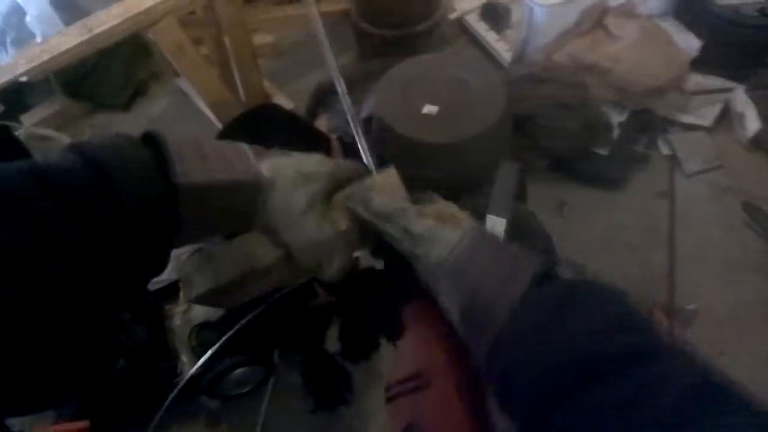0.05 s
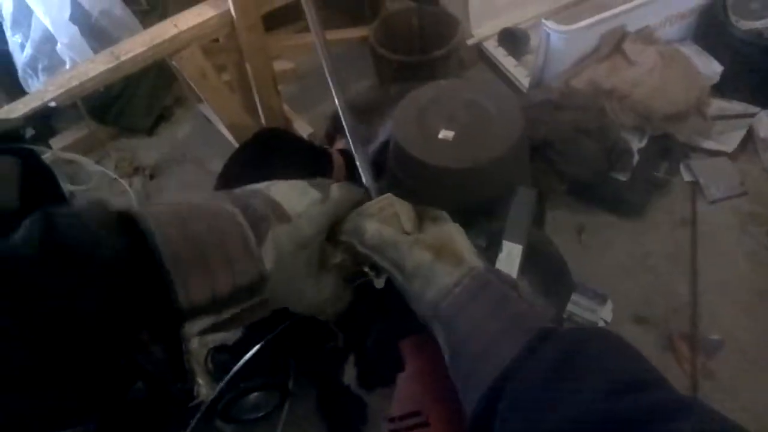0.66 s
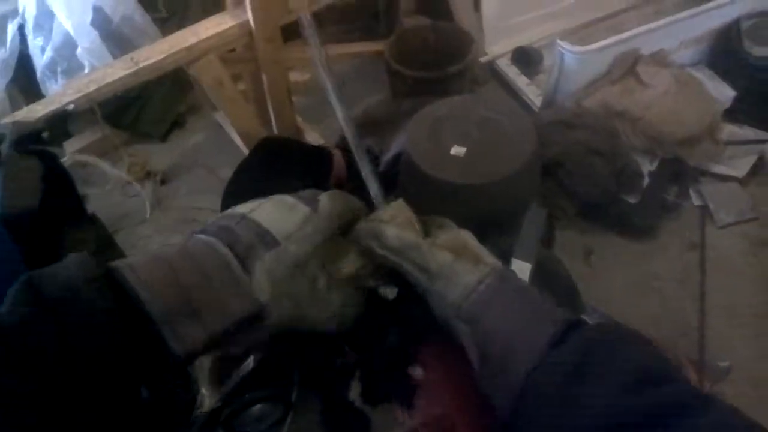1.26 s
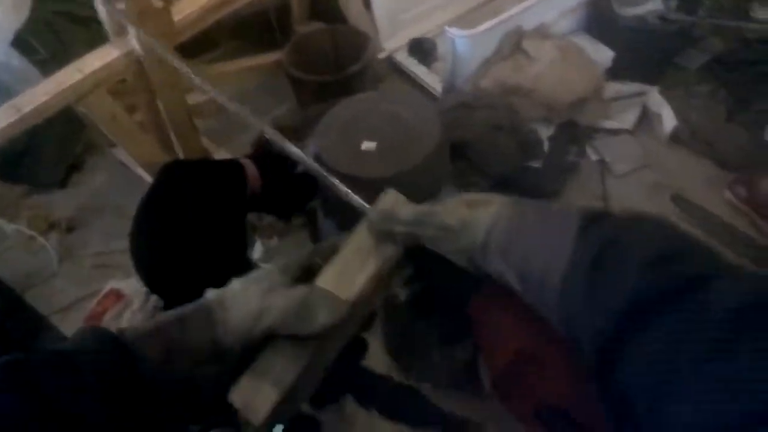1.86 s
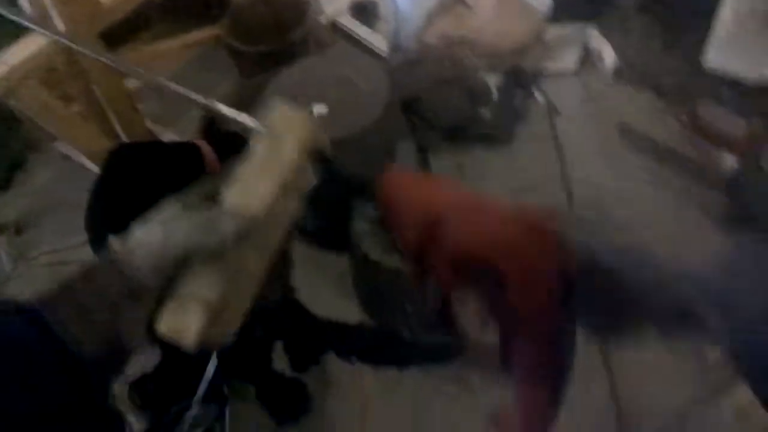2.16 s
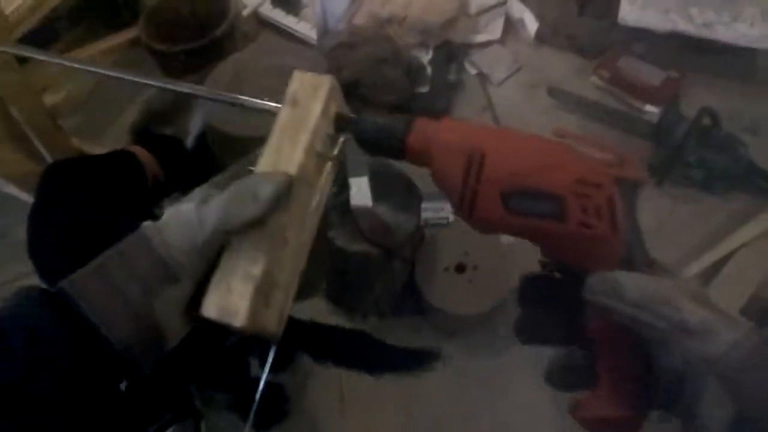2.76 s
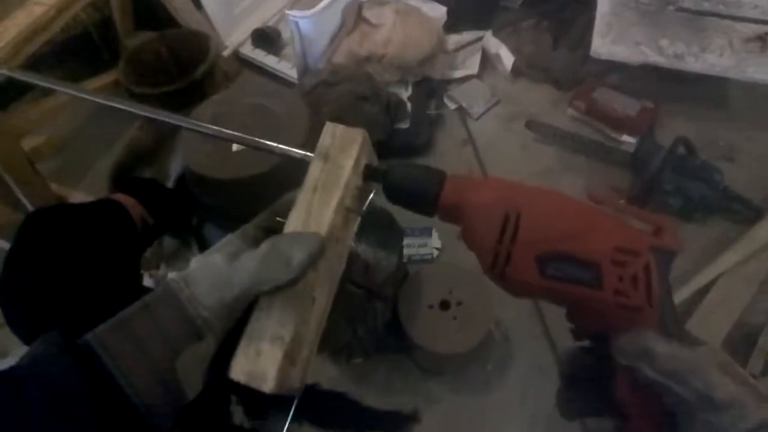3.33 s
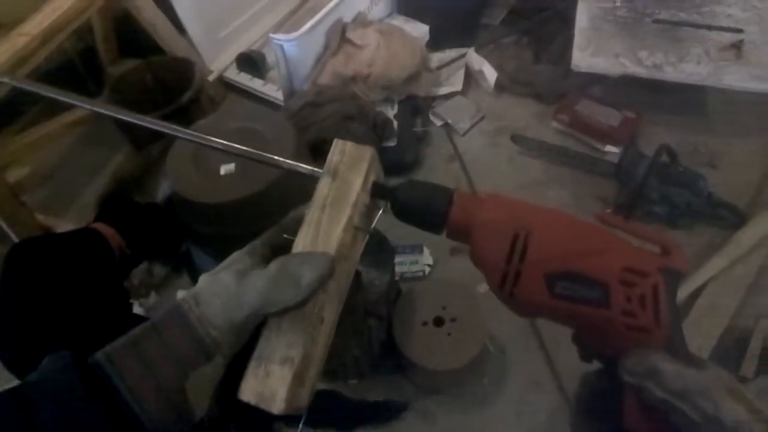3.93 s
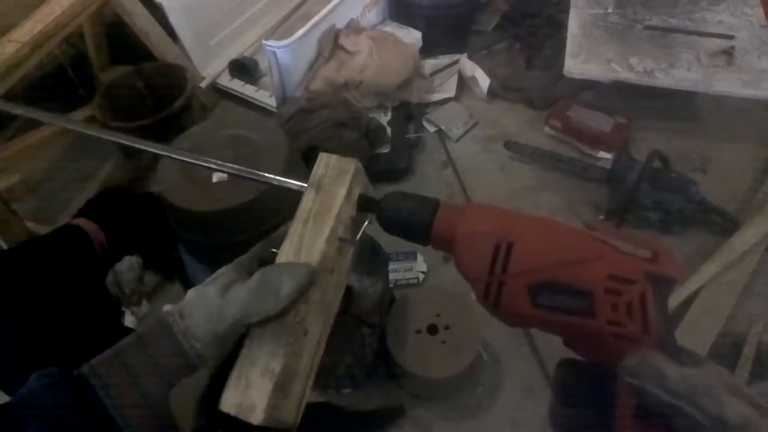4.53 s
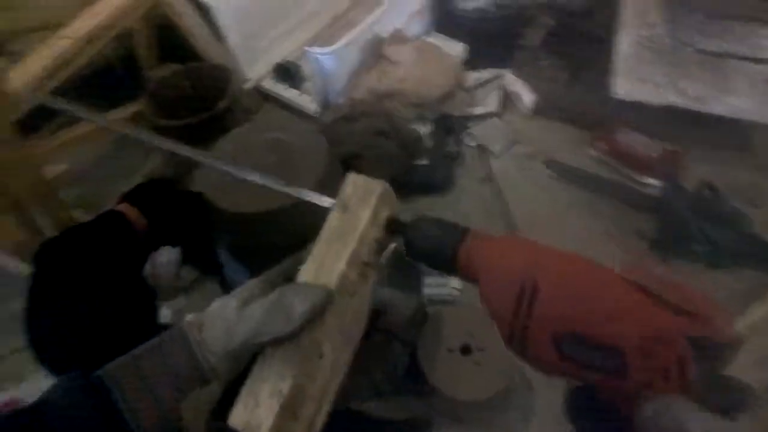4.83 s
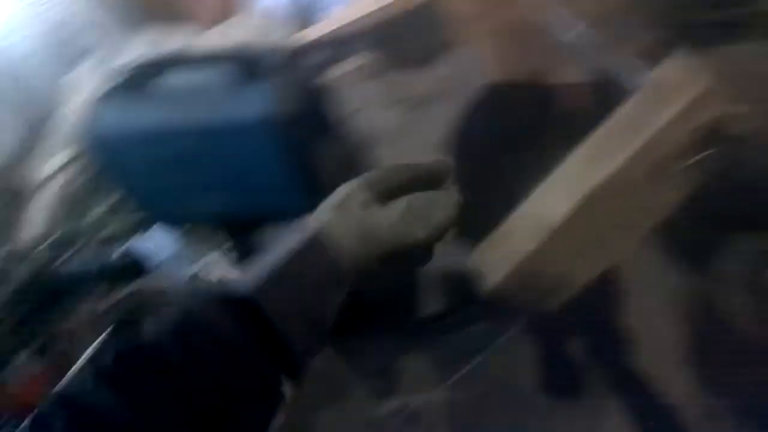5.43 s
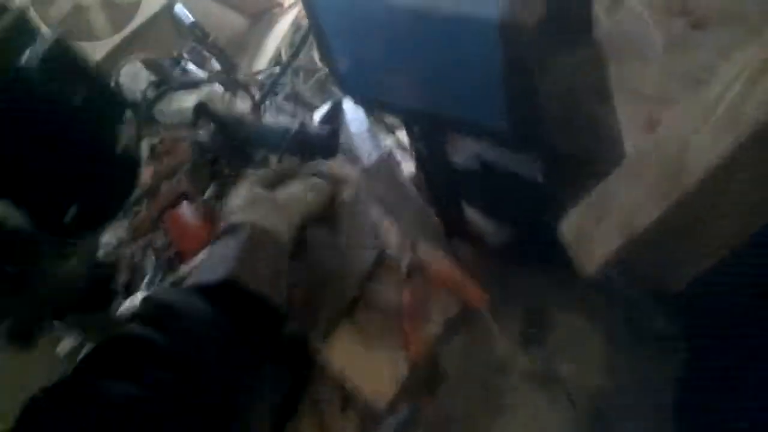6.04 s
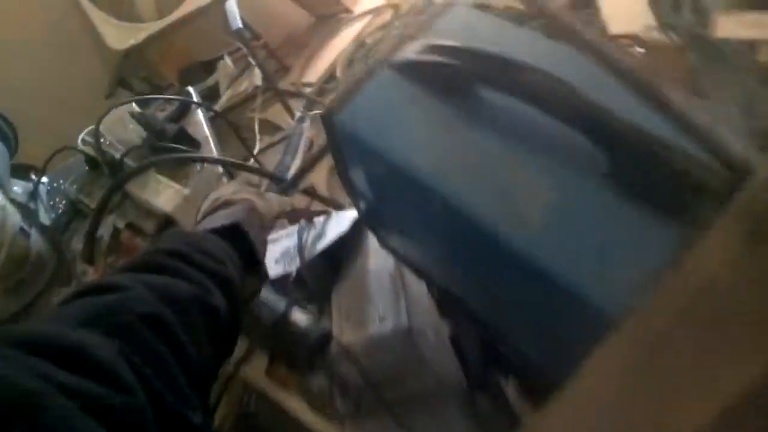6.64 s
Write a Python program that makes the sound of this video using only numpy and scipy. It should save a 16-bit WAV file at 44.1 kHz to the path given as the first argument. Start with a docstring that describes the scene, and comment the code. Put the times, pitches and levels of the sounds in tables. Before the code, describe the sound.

Gloved hands handle a wood block, a steel rod and a switched-off drill in a small, quiet workshop, heard close from a head-worn microphone with soft swells of low rumble. From about 0.7 seconds, leather and cloth rustle and scrape, with a few light wooden knocks. More rubbing and small clicks come around 1.5 seconds, then a brighter scrape and a sharp click near 2.2. The block knocks lightly at about 2.7. From 3 to 4.5 seconds the handling is faint, with isolated ticks and a clearer click at 4.1. A short rustle follows near 4.9. From 5.2 seconds the rubbing grows busier, with plastic and metal clicks and a few tiny squeaks, the clearest just before 6. Sharp clicks land around 6 and 6.2 seconds, and a bright click with a scrape ends it near 6.7.

```python
"""A small, quiet workshop: work gloves shift a wood block, a steel rod and a switched-off drill.
Friction makes cloth and leather rustle and scrape in fine grains, and stick-slip makes a surface squeak.
Impacts excite damped modes: plastic and metal click and ring, and the block knocks lightly.
All is heard from a head-worn camera, with soft swells of dull, low rumble close to the microphone."""
import sys
import numpy as np
from scipy import signal
from scipy.fft import rfft, irfft, next_fast_len
from scipy.io import wavfile

SR = 44100
rng = np.random.default_rng(int(sys.argv[2]) if len(sys.argv) > 2 else 0)


def int16_out(signal):
    """Quantize to a 16-bit WAV file."""
    q = np.round(np.clip(np.atleast_2d(signal).T, -1, 1) * 32767)
    wavfile.write(sys.argv[1], SR, q.astype(np.int16))


N = 295029
TIME = np.arange(N) / SR
FFT_SIZE = next_fast_len(N + 4096, True)
HZ = np.arange(FFT_SIZE // 2 + 1) * SR / FFT_SIZE


def undb(db):
    """Amplitude ratio of a level in decibels."""
    return 10 ** (np.asarray(db) / 20)


def unit(x):
    """Normalisation to an rms of 1."""
    return x / np.sqrt(np.mean(x ** 2) + 1e-30)


def colour(points):
    """Magnitude response interpolated through (frequency [Hz], gain [dB]) points."""
    hz, db = np.transpose(points)
    return undb(np.interp(np.log(HZ + 1), np.log(hz), db))


def shape(x, gain):
    """Filtering by multiplication in the frequency domain."""
    return irfft(rfft(x, FFT_SIZE) * gain, FFT_SIZE)[:N]


def above(hz):
    """Share of the power in the upper branch of a smooth crossover."""
    return 1 - 1 / (1 + (HZ / hz) ** 8)


def walk(rate):
    """Random modulation of rms 1 that changes about rate times a second."""
    knots = np.arange(0, N / SR + 1, 1 / (2 * rate))
    return unit(np.interp(TIME, knots, rng.standard_normal(N)[:len(knots)]))


def add(out, start_s, sound):
    """Superposition of a sound from a given time on."""
    start = int(start_s * SR)
    part = sound[:max(N - start, 0)]
    out[start:start + len(part)] += part


def burst(t, t60):
    """Exponentially damped noise, 60 dB down after t60 seconds."""
    return rng.standard_normal(len(t)) * np.exp(-np.log(1000) * t / t60)


def modal_response(modes, t):
    """Impulse response of damped modes: the wider the bandwidth, the faster the decay."""
    return sum(undb(db) * 2 * np.pi * width / SR * np.exp(-np.pi * width * t) * np.cos(2 * np.pi * hz * t)
               for hz, width, db in modes)


def swells(table, wander):
    """Briefly driven resonances: tones of unsteady pitch under Gaussian envelopes."""
    out, drift = np.zeros(N), walk(rate=334)
    for peak, half_width, hz, db in table:
        near = np.abs(TIME - peak) < 4 * half_width
        phase = 2 * np.pi * np.cumsum(hz * (1 + wander * drift[near])) / SR
        envelope = np.exp(-((TIME[near] - peak) / half_width) ** 2)
        out[near] += undb(db) * np.sqrt(2) * envelope * np.sin(phase)
    return out


# Spectrum of the still air: (frequency [Hz], relative level [dB])
AIR_SPECTRUM = [(15, -6), (32, -4), (50, 1), (75, 0), (110, -8), (200, -17), (400, -26), (1000, -33),
                (4000, -38), (14000, -44)]


def air(level_db):
    """Ambient noise: faint and stationary, with most of its power in the bass."""
    return undb(level_db) * unit(shape(rng.standard_normal(N), colour(AIR_SPECTRUM)))


# Spectrum of the rumble: (frequency [Hz], relative level [dB])
RUMBLE_SPECTRUM = [(60, -11), (110, -3), (170, -1), (240, 0), (320, -4), (450, -14), (800, -27),
                   (2000, -45), (6000, -70)]
# Swells of dull, low rumble: (peak time [s], rise and fall constant [s], level [dB])
RUMBLE_SWELLS = [(0.029, 0.25, -64), (.32, 0.086, -62), (0.611, 0.017, -60), (.83, 0.13, -67),
                 (1.36, 0.34, -69.5), (1.715, .06, -59), (2.015, 0.036, -52.5), (2.13, 0.5, -64),
                 (2.54, .1, -61), (3.4, 0.66, -72), (3.949, 0.033, -74.5), (4.65, 0.18, -69),
                 (4.879, 0.21, -62), (5.1, 0.071, -63.5), (5.46, 0.093, -67.5), (5.88, 0.15, -61),
                 (6.06, 0.044, -60), (6.55, 0.23, -66)]
# Soft bumps and brief hums: (peak time [s], half-width [s], frequency [Hz], level [dB])
LOW_BUMPS = [(.1, 0.19, 86.2, -69), (.48, 0.13, 80, -64.5), (.606, .003, 250, -59),
             (1.715, 0.035, 130.3, -52.5), (1.722, 0.03, 174.3, -55), (5.895, .012, 233, -55)]


def rumble():
    """Amplitude-modulated noise: swells of dull, low rumble close to the microphone, with soft bumps."""
    power = sum((undb(db) * np.exp(-np.abs(TIME - peak) / tau)) ** 2 for peak, tau, db in RUMBLE_SWELLS)
    low_noise = unit(shape(rng.standard_normal(N), colour(RUMBLE_SPECTRUM)))
    return low_noise * np.sqrt(power) + swells(LOW_BUMPS, wander=0.13)


# Colour of the reverberation: (frequency [Hz], relative gain [dB])
ROOM_RESPONSE = [(200, -18.5), (1500, 6.5), (4000, -12.0), (8000, -10.5), (14000, -25.0)]


def room(x, t60, gain_db):
    """Reverberation: dense reflections merge into a short tail, strongest in the mids."""
    t = TIME[:SR // 2]
    tail = burst(t, t60) * (t > .004)
    wet = signal.fftconvolve(x, tail / np.linalg.norm(tail))[:N]
    return undb(gain_db) * shape(wet, colour(ROOM_RESPONSE))


# Squeaks: (onset [s], duration [s], initial frequency [Hz], level [dB])
SURFACE_SQUEAKS = [(5.197, 0.015, 1395, -45), (5.456, 0.051, 1512, -59), (5.955, 0.09, 1354, -39.5),
                   (6.192, 0.016, 1122, -49.5), (6.247, .028, 1087, -57)]


def squeaks(jitter, shimmer_db, attack_s=0.021, sag_hz_per_s=1582, recover_s=0.087):
    """Stick-slip oscillation: a nearly pure, wavering tone that sags under pressure, then recovers."""
    out, drift, shimmer = np.zeros(N), walk(rate=290), walk(rate=170)
    for onset, length, hz, db in SURFACE_SQUEAKS:
        on = (TIME > onset) & (TIME < onset + 4 * length)
        age = TIME[on] - onset
        released = np.maximum(age - length, 0)
        sag = sag_hz_per_s * np.minimum(age, length) * np.exp(-released / recover_s)
        phase = 2 * np.pi * np.cumsum((hz - sag) * (1 + jitter * drift[on])) / SR
        attack = np.sin(np.pi / 2 * np.clip(age / attack_s, 0, 1)) ** 2
        decay = np.exp(-released / (0.35 * length))
        gain = attack * decay * undb(db + shimmer_db * shimmer[on])
        out[on] += np.sqrt(2) * gain * np.sin(phase)
    return out


# Brief rings: (peak time [s], half-width [s], frequency [Hz], level [dB])
DRAG_RINGS = [(.83, 0.041, 685, -61.5), (.952, 0.0048, 2830, -48.5), (1.40, 0.066, 645, -69),
              (1.352, 0.0038, 3230, -57), (1.422, 0.0033, 3600, -46.5), (1.468, 0.021, 3350, -50),
              (1.475, 0.022, 1760, -55.5), (2.120, 0.0087, 3300, -44), (2.138, .011, 3200, -44.5),
              (2.165, 0.011, 1188, -50.5), (2.205, 0.017, 2160, -61), (3.376, .0015, 7080, -48.5),
              (4.107, 0.003, 2700, -55), (6.042, .010, 5950, -43.5), (6.177, 0.0059, 5870, -39),
              (6.675, 0.011, 3000, -45)]


def rings():
    """Resonance: single modes of rod, block and drill sound as they are dragged or jolted."""
    return swells(DRAG_RINGS, wander=0.0615)


# Modes of the wood block: (frequency [Hz], bandwidth [Hz], relative level [dB])
WOOD_MODES = [(600, 140, -13), (1210, 43, 1), (1546, 150, 15), (2170, 62, 10), (2700, 47, 10.5),
              (3350, 55, -32), (4370, 230, -29)]
# Light knocks: (time [s], peak level [dB], contact time [s])
BLOCK_KNOCKS = [(0.606, -65, 0.0017), (0.72, -48.5, 0.0026), (0.7924, -46, 0.0021), (0.8088, -43.5, 0.0042),
                (0.9513, -42.5, 0.0013), (1.086, -57, 0.0012), (1.363, -53, 0.0017), (2.649, -44, 0.0016),
                (2.7305, -33, 0.0021), (2.763, -41, 0.0034), (4.0792, -55, 0.0019), (5.1333, -53.5, 0.0007),
                (5.369, -53, 0.0017), (5.3943, -54, .0016)]


def knocks(chatter_db, chatter_s):
    """Impact excitation: a tap rings the block's modes, and it chatters briefly against the rod."""
    out, t = np.zeros(N), TIME[:4096]
    response = modal_response(WOOD_MODES, t)
    for onset, db, contact_s in BLOCK_KNOCKS:
        contact = np.exp(-t / contact_s) + undb(chatter_db) * np.exp(-t / chatter_s)
        force = rng.standard_normal(len(t)) * contact
        knock = signal.fftconvolve(force, response)
        add(out, onset, undb(db) * knock / np.abs(knock).max())
    return out


# Modes of the tools: (frequency [Hz], bandwidth [Hz], relative level [dB])
TOOL_RESONANCES = [(1230, 100, 5), (2700, 510, 0), (3460, 495, -11.5), (4300, 300, -1.5), (6270, 250, 7),
                   (6640, 510, -21), (8370, 170, 8), (9630, 440, 0), (10800, 320, 7.5), (11300, 640, 2.5),
                   (12740, 1100, 4.5), (13060, 550, 9)]
# Clicks of plastic and metal: (time [s], peak level [dB], 60 dB decay time [s], treble gain [dB])
TOOL_CLICKS = [(.4835, -67, 0.013, -12), (0.9498, -36.5, 0.022, -19), (1.4194, -35.5, 0.017, -3),
               (1.637, -42, 0.033, 16), (1.723, -42.5, .03, 10), (2.25, -25.5, 0.026, 3),
               (3.0213, -50, 0.022, 2), (3.3677, -51, 0.016, 8), (3.374, -42, 0.032, 23),
               (3.502, -53, 0.019, -6), (4.1048, -30.5, 0.016, -5), (4.6186, -51, 0.0033, 20),
               (5.134, -55.5, .016, -17), (5.1905, -54.5, 0.019, -18), (5.485, -46, 0.014, 10),
               (5.5078, -32.5, 0.0085, 3), (5.6907, -42, 0.054, -7), (5.7436, -38, 0.035, -4.5),
               (5.8813, -41.5, 0.041, -15), (5.92, -41.5, 0.045, 5), (6.0368, -23.5, 0.018, -7),
               (6.1726, -26, 0.016, 12), (6.1771, -32.5, 0.047, -12), (6.5297, -44.5, 0.028, 0),
               (6.561, -41.5, 0.014, 15), (6.647, -26, 0.097, 25), (6.6516, -37, .018, 12)]


def clicks(crack_db):
    """Broadband excitation: hard edges snap past each other in a rough burst that rings the tools."""
    out, t = np.zeros(N), TIME[:4096]
    response = modal_response(TOOL_RESONANCES, t)
    response[0] += undb(crack_db)  # the direct, non-resonant part
    highpass = signal.butter(1, 7000, "high", fs=SR)
    for onset, db, t60, treble_db in TOOL_CLICKS:
        click = signal.fftconvolve(burst(t, t60), response)[:len(t)]
        click = click + (undb(treble_db) - 1) * signal.lfilter(*highpass, click)
        add(out, onset, undb(db) * click / np.abs(click).max())
    return out


# Spectrum of rubbing cloth: (frequency [Hz], relative level [dB])
CLOTH_SPECTRUM = [(180, -40.5), (380, -9.5), (680, -11), (850, -10), (1100, -8.5), (1500, -5), (2100, 0),
                  (3000, 2), (4200, -0.5), (4900, -5), (5900, -3.5), (7200, -7.5), (9500, -7), (10600, -5),
                  (14000, -0.5), (15000, -31)]
# Sub-bands that swell apart, one row each for bass, middle and treble: (edge frequency [Hz], ...)
FOLD_BANDS = [(600, 900), (1900, 2600, 3500, 5000), (9000, 11000, 12600)]


def friction(amplitudes, grain_db, flutter_db, fold_db):
    """Friction noise: fibres catch and let go in dense, uneven impulses, heard in three bands."""
    grain_size = np.minimum(rng.exponential(size=N), 4)  # a fibre holds only so much
    grains = rng.standard_normal(N) * undb(grain_db * grain_size)
    grains *= undb(flutter_db * walk(rate=73))
    spectrum = rfft(grains, FFT_SIZE) * colour(CLOTH_SPECTRUM)
    over_bass, over_middle = above(1300), above(6150)
    shares = (1 - over_bass, over_bass * (1 - over_middle), over_middle)
    out = np.zeros(N)
    for amplitude, share, edges in zip(amplitudes, shares, FOLD_BANDS):
        rub, band_index = np.zeros(N), np.searchsorted(edges, HZ)
        for k in range(len(edges) + 1):
            sub_band = irfft(spectrum * np.sqrt(share) * (band_index == k), FFT_SIZE)[:N]
            rub += sub_band * undb(fold_db * walk(rate=22))  # folds open and close, shifting the colour
        out += amplitude * unit(rub)
    return out


# Short, hard strokes: (onset [s], rise time [s], decay constant [s], relative mid level [dB],
# treble re mid [dB], bass re mid [dB])
LEATHER_SCRAPES = [(.715, .004, 0.021, -69.5, -24, 7), (0.799, 0.0056, 0.017, -60.5, -26, 3.5),
                   (.824, 0.011, 0.037, -58, -25, -9), (1.344, 0.021, 0.012, -58.5, 0.5, -2),
                   (1.447, 0.024, 0.02, -49.5, -5.5, -11), (1.528, 0.002, 0.018, -60, 5.5, -6),
                   (1.554, 0.01, 0.029, -60, 10.5, -15), (2.109, 0.0092, 0.0096, -50, 8.5, -33),
                   (2.131, 0.0052, 0.035, -58.5, 11, -29), (2.194, 0.0097, 0.0041, -47, 4.5, -12),
                   (2.252, 0.0077, 0.016, -51.5, 1.5, -22), (2.584, 0.0043, 0.014, -66, 11.5, -17.5),
                   (5.452, 0.012, 0.019, -56, -17, -5), (5.505, 0.0049, 0.0062, -58.5, 15, -9),
                   (6.027, 0.01, 0.031, -46, -2, -4.5), (6.17, 0.0056, 0.014, -46.5, 2.5, -20),
                   (6.421, 0.005, 0.011, -55, 3, -11.5), (6.436, 0.0022, 0.012, -63.5, 8, -8),
                   (6.648, 0.019, 0.13, -40.5, -5, -18.5)]


def scrapes():
    """Sliding friction: leather drags over wood and plastic, builds up, then slips free."""
    amplitudes, age = np.zeros((3, N)), TIME[:SR // 3]
    for onset, rise, fall, db, treble_db, bass_db in LEATHER_SCRAPES:
        stroke = np.clip(age / rise, 0, 1) * np.exp(-np.maximum(age - rise, 0) / fall)
        for band, band_db in zip(amplitudes, (bass_db, 0, treble_db)):
            add(band, onset, undb(db + band_db) * stroke)
    return friction(amplitudes, grain_db=1.0, flutter_db=0.9, fold_db=1.5)


def crinkles(drive, per_second, gain_db, t60):
    """Buckling: creases in stiff cloth pop at random treble pitches, louder under harder rubbing."""
    out, t = np.zeros(N), TIME[:1024]
    for when, pitch, weakness in rng.random((int(per_second * N / SR), 3)):
        onset = when * (N - 1) / SR
        crease = modal_response([(7500 + 6000 * pitch, 1500, 0)], t[:128])
        pop = signal.fftconvolve(burst(t, t60), crease)
        peak = undb(gain_db - 11 * weakness) * drive[int(onset * SR)]
        add(out, onset, peak * pop / np.abs(pop).max())
    return out


# Strokes of gloves and sleeves: (onset [s], duration [s], decay constant [s], relative mid level [dB],
# treble re mid [dB], bass re mid [dB])
GLOVE_STROKES = [(0.572, 0.11, 0.2, -81.5, -2.5, -4.5), (.71, 0.085, .04, -75.5, -7, -2.5),
                 (0.787, 0.17, 0.024, -59, -2, -17), (0.908, 0.031, 0.012, -58, -7, -29),
                 (0.924, .14, 0.11, -63, -11, -14), (1.172, 0.055, 0.052, -77, 2, 2),
                 (1.258, 0.078, 0.059, -67, -4, -17), (1.347, 0.15, 0.07, -65.5, -23, -0.5),
                 (1.503, 0.094, 0.22, -59.5, -1.5, -7.5), (1.683, 0.064, 0.11, -69.5, 6.5, -18),
                 (1.78, 0.22, 0.1, -68, -12.5, -9), (1.994, 0.1, .03, -63.5, -12.5, -7),
                 (2.118, 0.089, 0.086, -52.5, -6, -9), (2.322, .14, 0.023, -69.5, -19, -6),
                 (2.415, 0.15, 0.056, -72, -1.5, 5.5), (2.571, 0.17, 0.019, -60, 5, -11.5),
                 (2.753, 0.084, 0.033, -61.5, 6.5, -14), (2.822, 0.076, 0.051, -60, 0, -11.5),
                 (2.93, 0.091, 0.14, -68, -10, -13.5), (3.174, 0.15, .08, -79.5, 1, -14.5),
                 (3.3, 0.24, 0.24, -74.5, -2, -12.5), (4.253, 0.088, 0.076, -83, -3, -16.5),
                 (4.578, 0.42, 0.074, -67, -10, -9.5), (4.837, 0.087, 0.029, -55, 0, -6),
                 (4.913, 0.072, 0.05, -76, 0, -3), (5.018, 0.066, 0.05, -71.5, -10, -5.5),
                 (5.192, 0.033, .03, -75.5, -11, -1), (5.274, 0.039, 0.35, -72.5, 1, -4.5),
                 (5.43, 0.072, 0.063, -62.5, 1.5, -8.5), (5.607, 0.23, 0.24, -63, 0, -11),
                 (5.971, 0.083, 0.054, -55, 0, -3), (6.13, 0.11, 0.12, -61, -1, -5.5),
                 (6.344, 0.057, .04, -70, -3, -22), (6.42, 0.084, 0.11, -63, -10, -5.5),
                 (6.525, 0.14, .05, -59.5, -7, -13)]


def gloves(attack_share=0.35, steepness=1.6, bass_exponent=0.79, treble_exponent=1.44):
    """Friction noise follows a power law of sliding speed: fast rubbing is brighter and crinkles more."""
    power, exponents = np.zeros((3, N)), (bass_exponent, 1, treble_exponent)
    for onset, length, release, db, treble_db, bass_db in GLOVE_STROKES:
        near = (TIME > onset - length) & (TIME < onset + length + 10 * release)
        age = TIME[near] - onset
        swell = (1 + np.tanh(steepness * (age / (attack_share * length) - .5))) / 2
        speed = swell * np.exp(-np.maximum(age - length, 0) / release)
        for band, band_db, exponent in zip(power, (bass_db, 0, treble_db), exponents):
            band[near] += (undb(db + band_db) * speed ** exponent) ** 2  # incoherent strokes add in power
    amplitudes = np.sqrt(power)
    rub = friction(amplitudes, grain_db=3.0, flutter_db=0.88, fold_db=1.98)
    return rub + crinkles(drive=amplitudes[2], per_second=70, gain_db=18, t60=.014)


def early_reflections(x, echo_db, turn_rad):
    """Interference: echoes off block, drill and arms ripple the spectrum, which shifts as they move."""
    out, t = x, TIME[:1024]
    angle = turn_rad * walk(rate=3)
    for weight in (np.cos(angle), np.sin(angle)):
        echoes = rng.standard_normal(len(t)) * np.exp(-t / 0.0052) * (t > .0005)
        out = out + undb(echo_db) * weight * signal.fftconvolve(x, echoes / np.linalg.norm(echoes))[:N]
    return out


def widen(x, side_db):
    """Mid-side stereo: the sound is central, except for treble grains scattered to either side."""
    side = undb(side_db) * shape(x * np.tanh(walk(rate=4300)), above(5400) * above(5080))
    return np.array([x + side, x - side])


def scene():
    """Superposition of the working hands, their reverberation, low rumble and still air."""
    rubbing = early_reflections(gloves() + scrapes(), echo_db=-9.0, turn_rad=1.23) * undb(1.0)
    impacts = clicks(crack_db=-57) + knocks(chatter_db=-17.0, chatter_s=0.018)
    hands = rubbing + impacts + rings() + squeaks(jitter=0.017, shimmer_db=2.05)
    reverberation = room(hands, t60=0.16, gain_db=-15.5)
    return widen(hands + reverberation + rumble() + air(level_db=-73), side_db=-3.0)


def record(dry):
    """Band limiting: the camera cuts the top steeply, and its converter sits slightly off zero."""
    cutoff_hz, dc_offset = 14250, -.0016
    lowpass = signal.ellip(10, .2, 70, cutoff_hz, fs=SR, output="sos")
    return signal.sosfilt(lowpass, dry) + dc_offset


dry = scene()
out = record(dry)
int16_out(out)
```